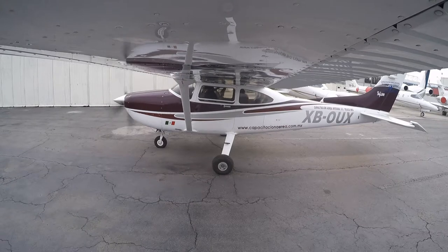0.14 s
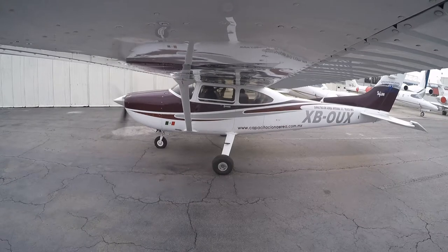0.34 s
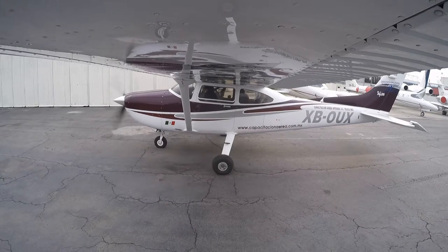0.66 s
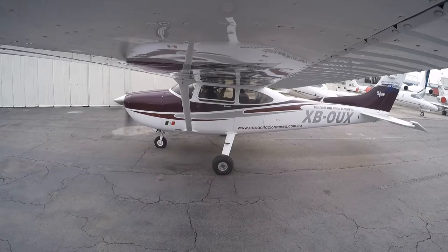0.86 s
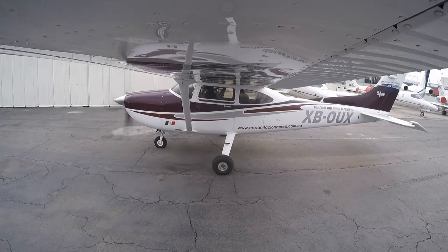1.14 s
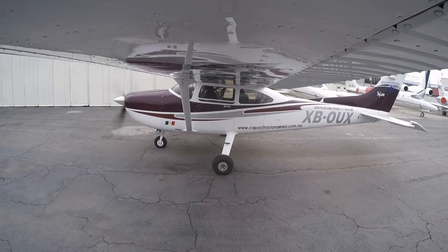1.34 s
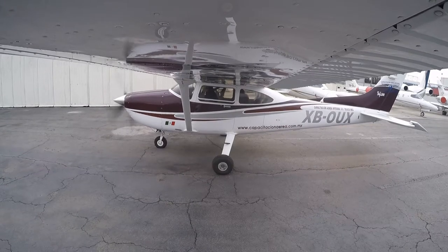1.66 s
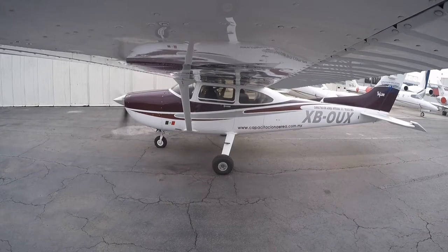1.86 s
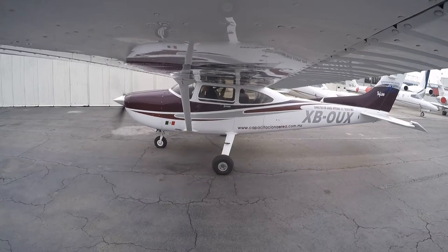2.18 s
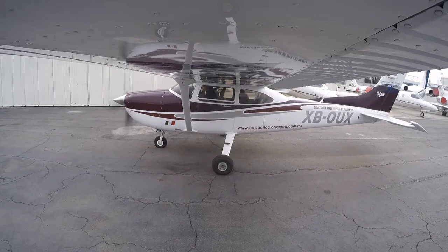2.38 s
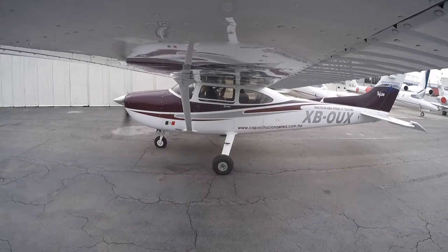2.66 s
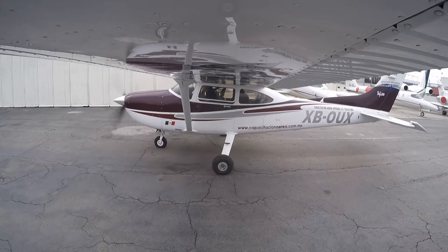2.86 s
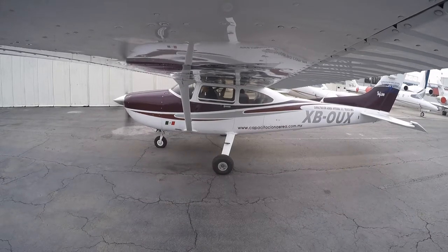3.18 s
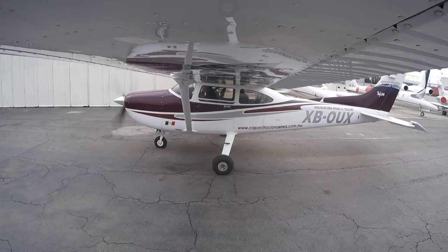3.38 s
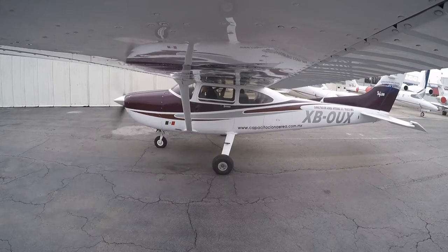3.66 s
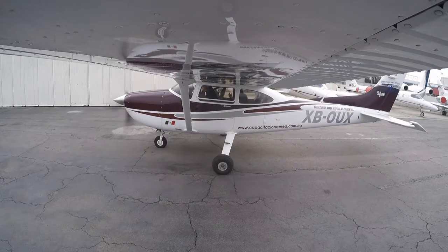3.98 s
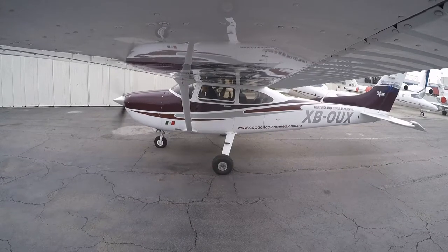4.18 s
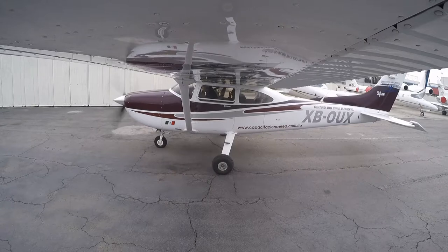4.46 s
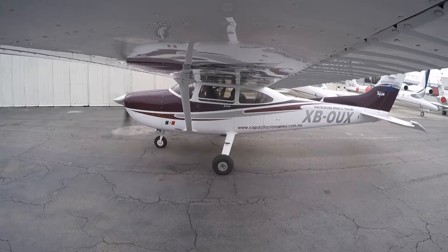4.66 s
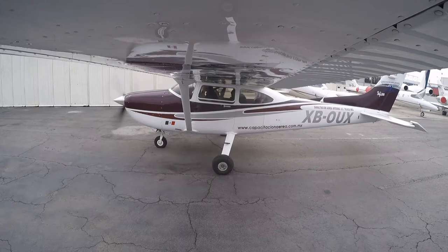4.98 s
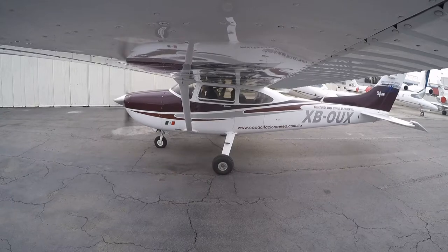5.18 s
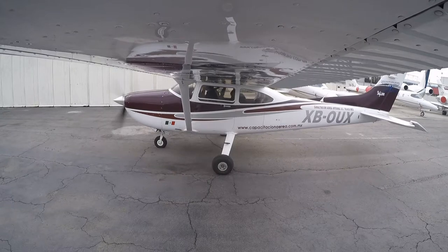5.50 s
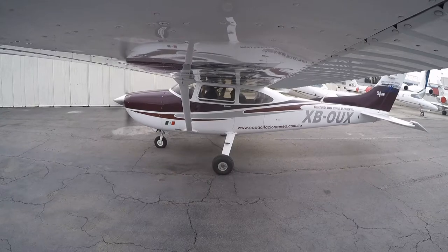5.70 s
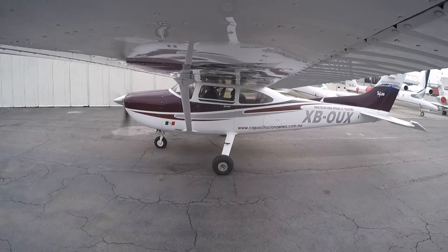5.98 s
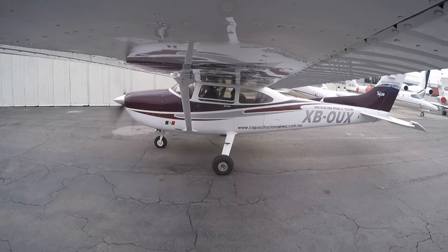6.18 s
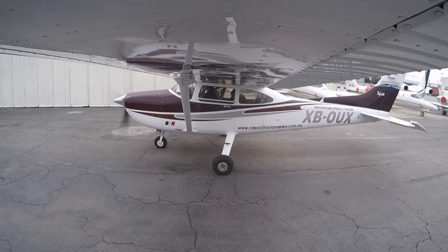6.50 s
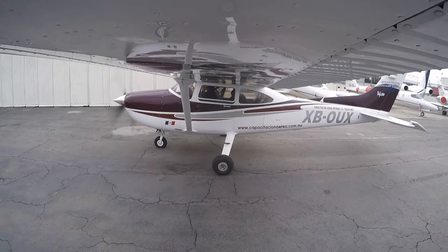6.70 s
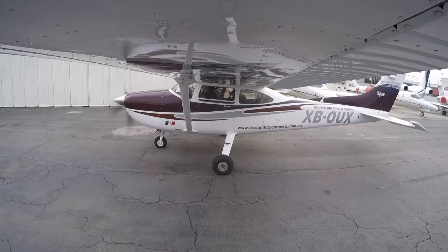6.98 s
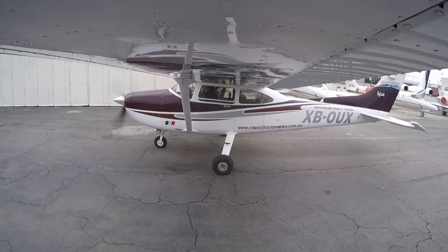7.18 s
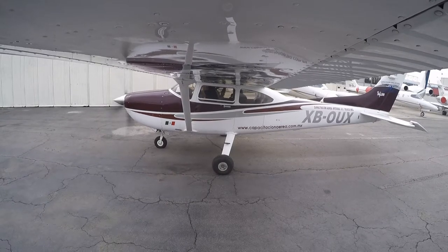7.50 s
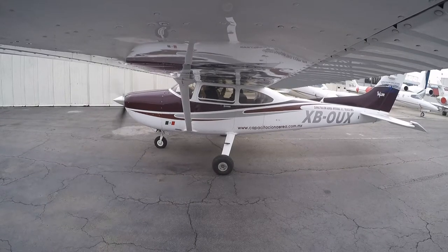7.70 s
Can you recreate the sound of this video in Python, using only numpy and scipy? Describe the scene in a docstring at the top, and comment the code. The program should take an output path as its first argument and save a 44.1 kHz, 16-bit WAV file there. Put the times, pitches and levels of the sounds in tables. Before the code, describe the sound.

A small single-propeller plane holds a constant idle, heard close from under its own wing. Buzzing, droning exhaust beats about fifty-seven times a second beneath dry, ragged propeller slaps that come and go in irregular bursts. Metallic valve chatter, breathy propeller wash and tiny high ticks surround it. Short reflections from the concrete thicken the slaps; the engine never starts, stops or revs.

```python
"""Blades slap in uneven gusts over a droning exhaust: a six-cylinder light aircraft idles on an apron,
heard from under its own wing. Slaps are filtered clicks with torn-air noise, a crack and a ground echo.
The drone is a sum of sines on the engine-cycle orders; valve gear is resonant noise bursts at each firing.
Behind them lie filtered noise for the air rush and the wing's rumble, and faint high ticks."""
import sys
import numpy as np
from scipy import signal
from scipy.fft import rfft, irfft
from scipy.io import wavfile
from scipy.ndimage import map_coordinates

SR = 44100
rng = np.random.default_rng(int(sys.argv[2]) if len(sys.argv) > 2 else 0)


def int16_out(signal):
    """Quantize to a 16-bit WAV file."""
    q = np.round(np.clip(np.atleast_2d(signal).T, -1, 1) * 32767)
    wavfile.write(sys.argv[1], SR, q.astype(np.int16))


N = 346185
T = np.arange(N) / SR


def undb(db):
    """Decibels to gain."""
    return 10 ** (np.asarray(db) / 20)


def unit(x):
    """Scale to rms 1."""
    return x / np.sqrt(np.mean(x ** 2))


def curves(table):
    """Interpolate each column after t/s to one value per sample."""
    t_s, *columns = np.transpose(table)
    return [np.interp(T, t_s, column) for column in columns]


def noise():
    """White noise, rms near 1."""
    return rng.standard_normal(N)


def walk(knots_per_s):
    """Smooth random control: cubic spline through normal knots, spread near 1."""
    knots = rng.standard_normal(2048)
    coarse_s = T[::64]
    values = map_coordinates(knots, [coarse_s * knots_per_s], order=3, mode="wrap")
    return np.interp(T, coarse_s, values)


def colour(x, points):
    """Minimum-phase filter through (f/Hz, level/dB) points, output rms 1."""
    f_hz, level_db = np.transpose(points)
    size = 2 ** 11
    log_f = np.log(np.fft.rfftfreq(size, 1 / SR) + 1)
    log_gain = np.log(undb(np.interp(log_f, np.log(f_hz), level_db)))
    # fold the cepstrum to its causal half
    cepstrum = irfft(log_gain)
    cepstrum[1:size // 2] *= 2
    cepstrum[size // 2 + 1:] = 0
    impulse = irfft(np.exp(rfft(cepstrum)))
    return unit(signal.oaconvolve(x, impulse)[:N])


def resonate(x, modes):
    """Parallel two-pole peaks, each applied twice for steep skirts; output rms 1."""
    out = 0
    for f_hz, half_width_hz, level_db in modes:
        b, a = signal.iirpeak(f_hz, f_hz / (2 * half_width_hz), fs=SR)
        once = signal.lfilter(b, a, x)
        out = out + undb(level_db) * signal.lfilter(b, a, once)
    return unit(out)


def pulses(times_s, sizes):
    """Clicks at fractional sample positions, each shared between two samples."""
    at = np.asarray(times_s) * SR
    inside = (at > 0) & (at < N - 2)
    at, sizes = at[inside], sizes[inside]
    i = at.astype(int)
    return np.bincount(i, sizes * (1 - at + i), N) + np.bincount(i + 1, sizes * (at - i), N)


def bursts(clicks, rise_s, decay_s):
    """Each click opens a noise puff that swells and decays; two one-pole lags shape it, rms 1."""
    envelope = clicks
    for lag_s in (rise_s, decay_s):
        envelope = signal.lfilter([1], [1, -np.exp(-1 / (lag_s * SR))], envelope)
    return unit(envelope * noise())


def moments(counts, firing):
    """Times in s at which the engine reaches these firing counts; outside the scene if never."""
    return np.interp(counts, firing, T, left=-1, right=T[-1] + 1)


def specks(count=60, level_db=-58, spread_db=2.0):
    """Faint, sharp lone ticks in the high treble at random times."""
    sizes = undb(spread_db * np.clip(rng.standard_normal(count), -2, 2))
    clicks = pulses(rng.random(count) * T[-1], sizes)
    return undb(level_db) * colour(clicks, [(2000, -17), (7000, 1), (15000, 1)])


def wing(level_db=-21):
    """The propeller wash buffets the wing: noise excites its modes, strongest at the low ones."""
    # wing modes: f/Hz, half-width per pass/Hz, level/dB
    wing_modes = [(24.3, 0.82, 2), (44.7, 2.15, -5.5), (55, 5.5, -25), (98.2, 3.3, -21), (132, 21.5, -26.5),
                  (204.2, 22, -28.5), (257.5, 30.7, -36.5), (355, 64, -51)]
    return undb(level_db) * resonate(noise(), wing_modes)


def air_rush(firing, rush_db, swish=0.24, broad_db=3, hollow_db=-8):
    """Turbulent air behind the propeller: noise swells with each blade and rings a hollow resonance."""
    # broadband rush spectrum: f/Hz, level/dB
    rush_colour = [(150, -8), (330, -3.5), (480, -10), (620, -1), (800, 0), (1050, 0), (1300, 0.5),
                   (1650, -1), (1950, -8.5), (2450, -5.5), (3050, -14.5), (3900, -8.5), (6300, -16.5),
                   (15000, -37)]
    swell = (1 + swish * np.cos(2 * np.pi * firing)) * undb(1.0 * walk(18))
    broad = colour(noise() * swell, rush_colour)
    hollow = resonate(noise() * swell, [(753, 47, -3.1), (869, 49, -0.39)])
    return undb(rush_db) * (undb(broad_db) * broad + undb(hollow_db) * hollow)


def valves(firing, clatter_db, count=462, scatter_db=3.5, loose_s=0.0009):
    """Valve gear knocks once a firing: noise puffs ring modes, with timing and voice per cylinder."""
    # cylinders in firing order: delay from the whole count/firings, relative clack, ring, tick/dB
    cylinders = [(-0.25, -3.5, -2.5, 10), (-0.18, -4, -1.5, 5), (-0.28, -6.5, -2, 5), (-0.13, -6, -3, -1),
                 (-0.3, -3, 3.5, 6), (-0.094, -8, -4, 1)]
    # clack, ring and sizzle modes: f/Hz, half-width per pass/Hz, level/dB
    clack_modes = [(2150, 84, -5.5), (2435, 72, 2), (2632, 71, -2), (2780, 16, -0.5), (3440, 82, -6),
                   (3534, 111, 3.5), (3677, 59, 1.5), (3750, 220, -12)]
    ring_modes = [(3930, 210, -3), (4300, 140, -1), (4595, 220, 1.5), (4784, 120, 3), (5210, 170, -7),
                  (5620, 116, -8.5), (6860, 130, -12.5)]
    sizzle_modes = [(7470, 140, -0.5), (8300, 750, -2.5), (9100, 450, 0.5), (9760, 400, -4.5),
                    (10110, 270, -3)]
    # tick spectrum: f/Hz, level/dB
    tick_colour = [(2000, -20), (3200, -33), (4500, 8.5), (5600, 1.5), (6100, -15), (6600, -11),
                   (6900, 4.5), (7500, -0.5), (8200, -5.5), (10100, -4), (11600, -12), (12300, -11),
                   (13500, -14), (15500, -24)]

    n = np.arange(count)
    delay, clack_db, ring_db, tick_db = np.array(cylinders)[n % len(cylinders)].T
    times_s = moments(n + delay, firing) + loose_s * rng.standard_normal(count)
    force_db = 0.31 * rng.standard_normal(count)  # common to all voices

    def knocks(voice_db, spread_db, rise_s, decay_s):
        """One puff a firing, each of its own strength."""
        chance = np.clip(rng.standard_normal(count), -2, 2)
        sizes = undb(voice_db + force_db + spread_db * chance)
        return bursts(pulses(times_s, sizes), rise_s, decay_s)

    clack = resonate(knocks(clack_db, scatter_db, 0.00048, 0.0092), clack_modes)
    ring = resonate(knocks(ring_db, scatter_db, 0.0015, 0.0043), ring_modes)
    tick = colour(knocks(tick_db, 1.0, 0.0004, 0.017), tick_colour)
    # wide, separate scatter: now and then a knock catches one bright mode
    sizzle = 0
    for mode in sizzle_modes:
        sizzle = sizzle + undb(mode[2]) * resonate(knocks(0, 8.9, 0.00024, 0.0066), [mode])
    mix = undb(-3.5) * clack + undb(-5.5) * ring + undb(-7.5) * tick + undb(-14.5) * unit(sizzle)
    return undb(clatter_db) * mix


def exhaust(firing, waver_db=1.0, lumpy_rad=0.11):
    """Sines on orders of the six-firing cycle; level and phase wander as no two cycles burn alike."""
    # steady engine and propeller tones: order/(multiple of cycle rate), mean level/dB
    steady_orders = [(2, -21.5), (4, -26.5), (5, -34.5), (6, -38.5), (8, -49), (9, -25), (13, -41),
                     (14, -35), (18, -41), (22, -44), (23, -44.5), (24, -54.5), (26, -49.5), (27, -45),
                     (28, -64), (29, -51), (33, -51.5), (36, -48), (37, -52.5), (39, -53), (49, -52.5),
                     (57, -60), (60, -53.5), (78, -46), (108, -47.5)]
    # boom, and hum at five times the firing rate; only change from the peak is used: t/s, level/dB
    boom = [(0, -23.5), (.9, -23), (1.55, -25.5), (2.2, -21.5), (2.8, -28), (3.5, -27), (4.2, -30),
            (5.0, -35.5), (5.35, -28.5), (6.0, -44), (7.3, -50.5), (7.85, -38)]
    hum = [(0, -32.5), (.25, -34), (.5, -43), (2.5, -40.5), (3.0, -38.5), (3.6, -45.5), (5.4, -48.5),
           (5.9, -41.5), (6.5, -42), (7.1, -39.5), (7.85, -36)]
    # orders tied to boom or hum: order (rounded for pitch), level at its peak/dB, share of its dB change
    # a negative share grows as the boom eases
    boom_orders = [(3, -17.5, 0.01), (10, -58, -0.46), (12, -42.5, -0.32), (15, -21.5, 1.),
                   (21, -31.5, 0.54)]
    hum_orders = [(30, -33.5, 1.09), (42, -44, 1), (54, -45, 0.74), (65.4, -40, 1.4), (72.2, -44, 0.7)]

    cycle = firing / 6
    lines = list(steady_orders)
    for table, orders in ((boom, boom_orders), (hum, hum_orders)):
        level_db, = curves(table)
        change_db = level_db - level_db.max()
        lines += [(order, db + share * change_db) for order, db, share in orders]
    out = 0
    for order, db in lines:
        # equals lumpy_rad at order 20 and keeps growing above it
        wander = lumpy_rad * np.sqrt(order / 20) * walk(8.2)
        angle = 2 * np.pi * (round(order) * cycle + rng.random()) + wander
        out = out + np.sqrt(2) * undb(db + waver_db * walk(6)) * np.sin(angle)
    return out


def inflow(flutter_db=2.5, flutter_per_s=19, attack_s=0.017, release_s=0.038):
    """Slap level/dB and extra crack/dB: a fluttering breeze, overtaken by gusts crossing the propeller."""
    # light breeze between gusts: t/s, slap level before flutter/dB
    breeze = [(0, -39.5), (.4, -31), (.6, -36), (1.05, -30), (1.6, -35.5), (2.2, -31), (3.05, -34.5),
              (4.6, -39.5), (5.2, -37), (5.8, -41), (6.05, -32.5), (6.3, -42.5), (6.5, -34), (6.8, -43),
              (7.85, -29)]
    # gusts: start of full force t/s, hold/s, slap level/dB, extra crack/dB
    gusts = [(1.236, 0.11, -27.5, 5), (1.353, 0.088, -24, -3), (1.694, 0.026, -29, -1),
             (1.811, 0.13, -24.5, 0), (2.23, .06, -30, 0), (2.307, 0.086, -25, 3), (2.597, 0.054, -25, 0),
             (2.713, .012, -22.5, 6), (2.843, .03, -24, -7), (2.881, .08, -23.5, 3), (3.265, .09, -25, 1),
             (3.375, 0.043, -26.5, -2), (3.517, 0.068, -25.5, -3), (3.645, 0.25, -26, -1.5),
             (3.965, 0.024, -26, 5), (4.202, 0.055, -25.5, 0), (4.29, 0.074, -27.5, 0),
             (4.406, 0.013, -29, 5), (5.019, 0.013, -30, 1), (5.374, 0.011, -30, -4),
             (5.426, 0.033, -31, 0), (5.685, 0.021, -29.5, 1), (6.88, .025, -29, -5),
             (6.964, .012, -26.5, 3), (7.086, .06, -27, 0), (7.16, 0.12, -26.5, 1),
             (7.329, 0.036, -29.5, 9), (7.436, 0.1, -25.5, 8), (7.595, .06, -26, 7), (7.68, 0.07, -28.5, 7)]
    breeze_db, = curves(breeze)
    force = undb(breeze_db + flutter_db * walk(flutter_per_s))
    extra_crack_db = np.zeros(N)
    for start_s, hold_s, db, extra_db in gusts:
        shape = np.interp(T - start_s, [-attack_s, 0, hold_s, hold_s + release_s], [0, 1, 1, 0])
        gust = undb(db) * shape
        extra_crack_db = np.where(gust > force, extra_db, extra_crack_db)
        force = np.maximum(force, gust)
    return 20 * np.log10(force), extra_crack_db


def propeller(firing, count=460, sway_s=0.0001, clean_db=0.06, ragged_db=-12):
    """One blade slap a firing; inflow sets its force, hard slaps steepen into cracks, concrete echoes."""
    # slap and crack spectra: f/Hz, level/dB
    slap_colour = [(200, -29.5), (450, -18.5), (750, -11), (950, -8.5), (1035, 0), (1090, -6), (1150, 2),
                   (1330, 3.5), (1450, 2), (1620, 0), (1800, -9.5), (2000, -23), (3050, -25), (3600, -28),
                   (12000, -40)]
    crack_colour = [(500, -19), (900, 13), (1500, -10), (1950, -2), (2150, 11.5), (2650, 2), (2850, 8),
                    (3000, -50), (3250, -27), (3400, 6.5), (4100, -4), (5600, -2), (6300, -24.5),
                    (12000, -27)]
    hard_slap_db, hard_crack_db, crack_growth = -21, -28.5, 2.1  # growth in dB per dB of slap
    echo_s, echo_db = 0.0087, -15.5

    slap_db, extra_crack_db = inflow()
    crack_db = hard_crack_db + crack_growth * (slap_db - hard_slap_db) + extra_crack_db
    swayed = firing + sway_s * np.gradient(firing, T) * walk(7)
    times_s = moments(np.arange(count), swayed) - 0.001
    sizes = undb(1.0 * rng.standard_normal(count))
    clicks = pulses(times_s, sizes) + undb(echo_db) * pulses(times_s + echo_s, sizes)
    # blade length spreads each slap over a few cycles: all-pass at 1330 Hz
    spread = clicks - 2 * signal.lfilter(*signal.iirpeak(1330, 2.6, fs=SR), clicks)
    clean = colour(spread, slap_colour)
    # trailing puff of torn air
    ragged = colour(bursts(clicks, 0.00024, 0.011), slap_colour)
    slap = undb(slap_db) * (undb(clean_db) * clean + undb(ragged_db) * ragged)
    crack = undb(crack_db) * colour(-clicks, crack_colour)
    return slap + crack


def scene(start_firings=0.27):
    """Three firings and three blades pass in every crankshaft turn; one count drives both."""
    # engine speed: t/s, speed/rpm
    speed = [(0.0, 1151.2), (0.6, 1141.2), (1.1, 1147.0), (1.7, 1145.2), (2.3, 1143.4), (2.6, 1149.7),
             (3.6, 1150.6), (4.2, 1148.9), (4.8, 1149.9), (5.4, 1152.0), (5.8, 1154.2), (6.3, 1156.5),
             (7.1, 1153.5), (7.85, 1152.3)]
    # engine effort: t/s, clatter gain/dB, air rush gain/dB
    effort = [(0, -32, -33), (.5, -32.5, -35), (2.7, -32, -34.5), (4.0, -32.5, -35), (6.0, -33.5, -34.5),
              (6.9, -32.5, -35), (7.85, -32.5, -33.5)]
    rpm, = curves(speed)
    firing = start_firings + np.cumsum(3 * rpm / 60) / SR
    clatter_db, rush_db = curves(effort)
    background = specks() + wing() + air_rush(firing, rush_db)
    engine = valves(firing, clatter_db) + exhaust(firing)
    return (background + engine + propeller(firing))[None]


def record(dry, top_hz=15300):
    """Steep elliptic low-pass ends the treble at top_hz."""
    return signal.sosfilt(signal.ellip(10, .2, 80, top_hz, fs=SR, output="sos"), dry)


dry = scene()
out = record(dry)
int16_out(out)
```